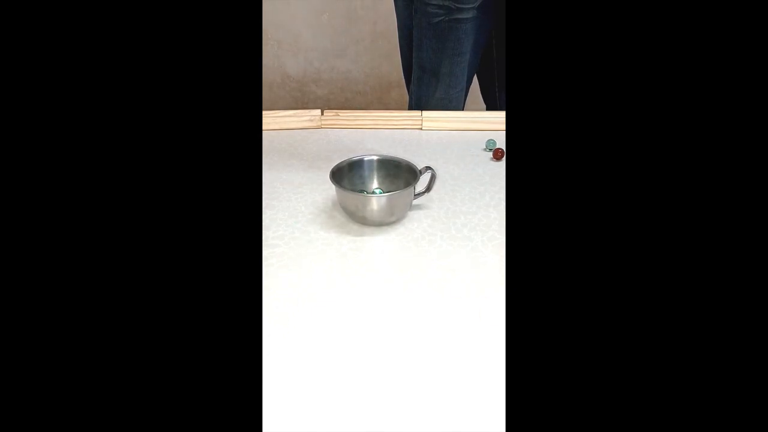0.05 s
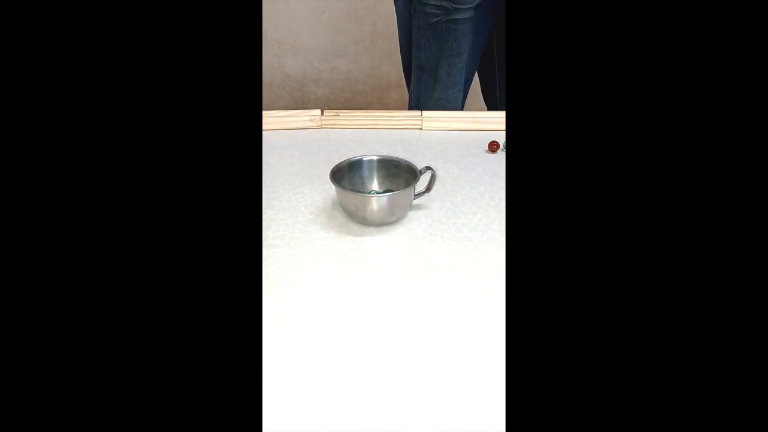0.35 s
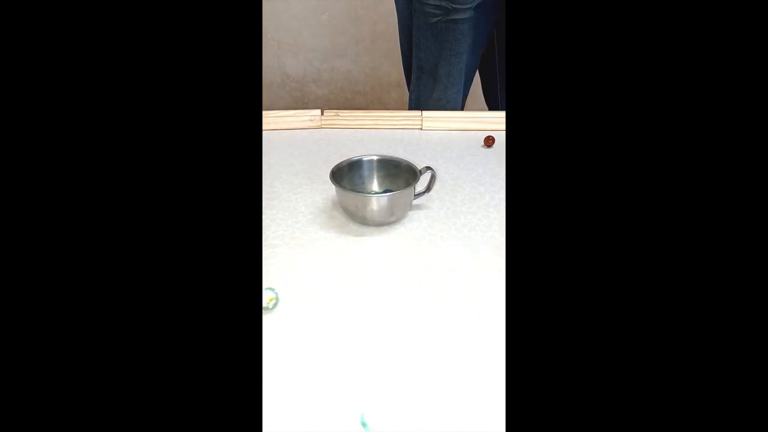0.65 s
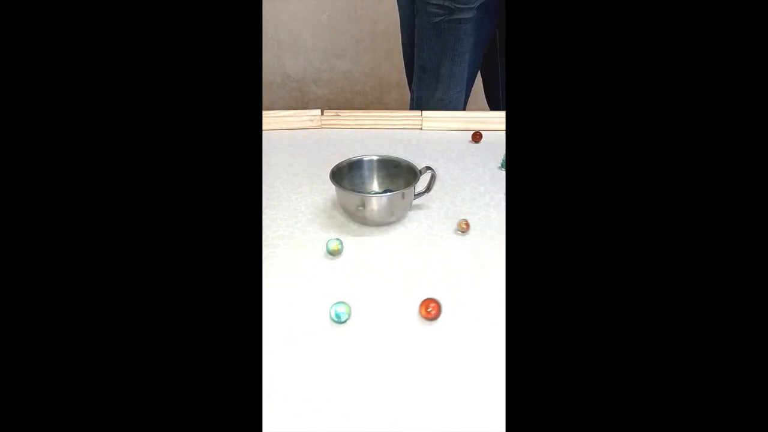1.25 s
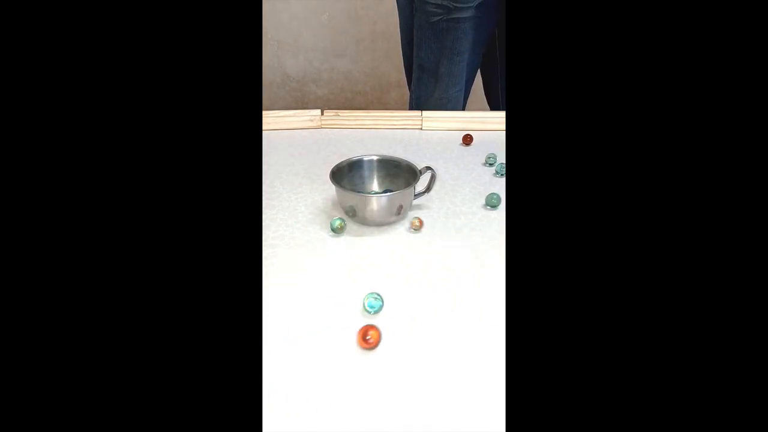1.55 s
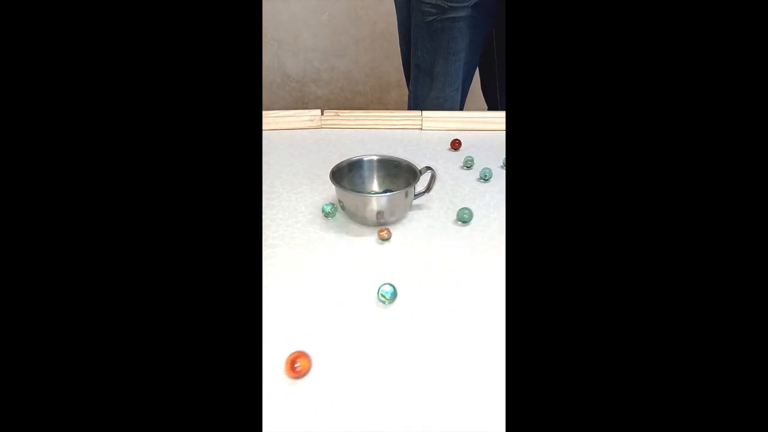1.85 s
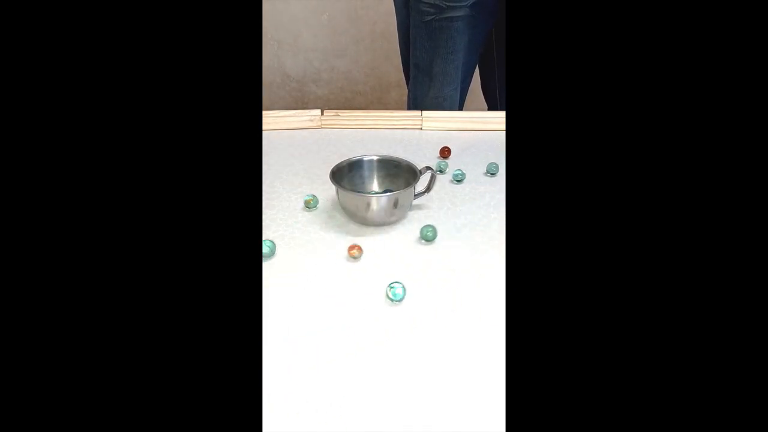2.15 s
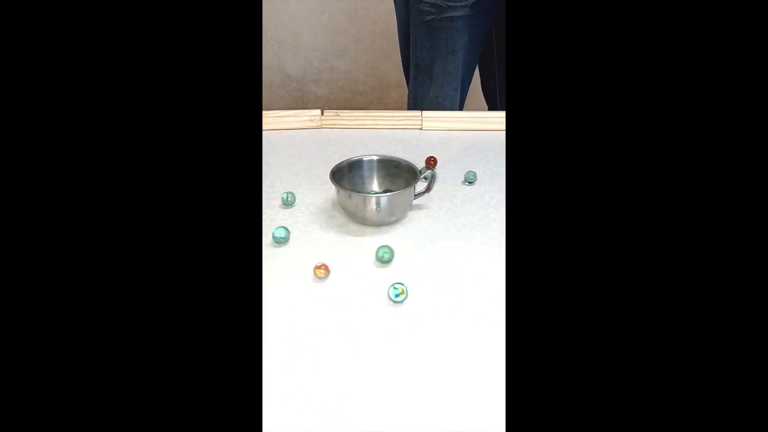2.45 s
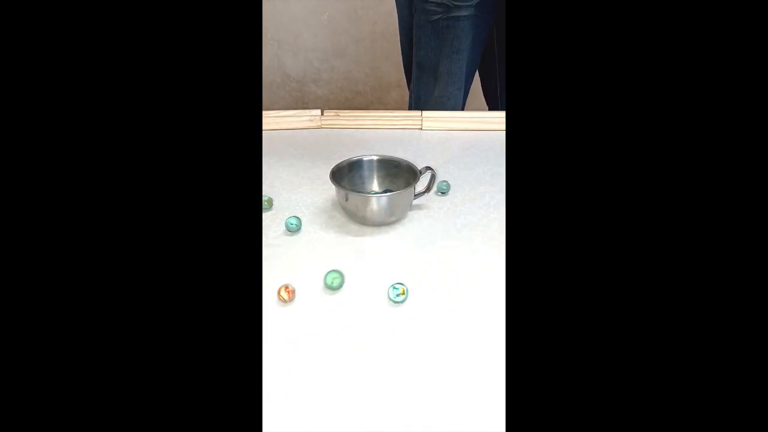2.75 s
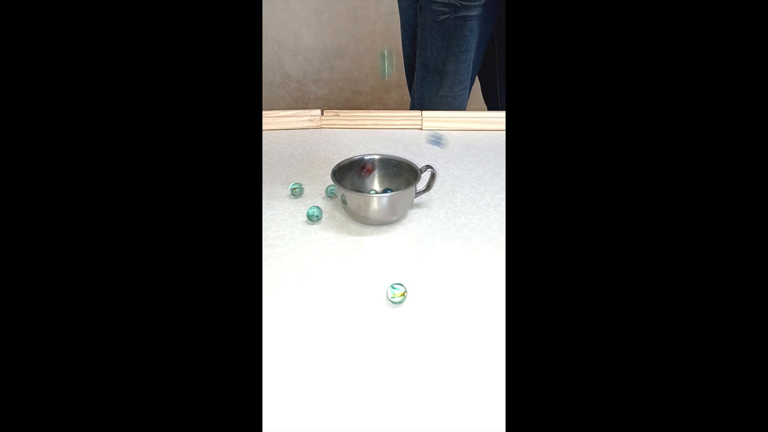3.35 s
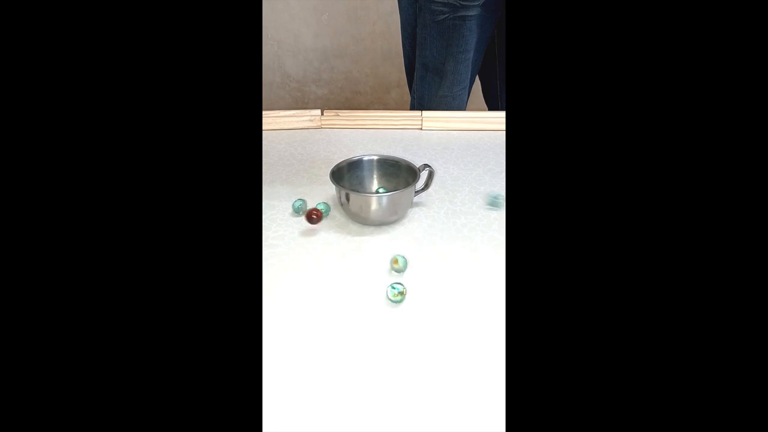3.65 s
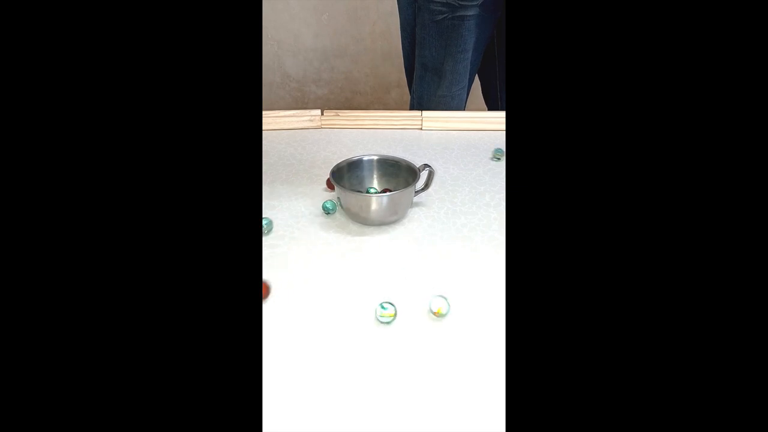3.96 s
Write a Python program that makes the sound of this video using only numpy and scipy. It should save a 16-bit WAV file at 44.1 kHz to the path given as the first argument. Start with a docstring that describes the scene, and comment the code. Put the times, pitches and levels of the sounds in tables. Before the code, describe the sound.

In a small bare room, glass marbles rumble and hiss over a hard table near the microphone. A loud clack follows, then a quick clatter of falling marbles that bounce, knock together and strike a ringing metal cup.

```python
"""On a hard tabletop in a small bare room, glass marbles roll close to the microphone.
A steel cup still rings from an earlier marble as the scene opens. Rolling marbles rumble, whirr and hop;
then more are dropped, clacking on the table, clicking together and setting the cup ringing again.
The room echoes every blow. The recorder's limiter, an automatic volume control, turns the hardest
blows down, so that their echo swells up behind them."""
import sys
import numpy as np
from scipy import signal
from scipy.fft import rfft, irfft, next_fast_len
from scipy.io import wavfile
from scipy.ndimage import uniform_filter1d, minimum_filter1d, map_coordinates

SR = 44100
rng = np.random.default_rng(int(sys.argv[2]) if len(sys.argv) > 2 else 0)


def pcm_store(signal):
    """Save signal as 16-bit PCM."""
    levels = np.round(np.clip(np.atleast_2d(signal), -1, 1) * 32767)
    wavfile.write(sys.argv[1], SR, levels.astype(np.int16).T)


N = 176400  # 4 seconds

# The tabletop's own tones. A fade time is how long a sound takes to fall by 60 dB.
# (pitch [Hz], level under rolling [dB], level under a landing [dB], fade time [s])
TABLE_TONES = [(78, -35, -2, 0.075), (128.3, -1.5, -3, 0.12), (214.1, -8, -14.5, 0.37),
               (259.5, -15, -5.5, 0.08), (321.7, 1, -15.5, 0.22), (415.6, -5, -23.5, 0.48),
               (463.3, 10.5, -21, 0.083), (509.2, 10.5, -14, 0.15), (648, 13.5, -8.5, 0.063)]


def amp(db):
    return 10 ** (np.asarray(db) / 20)


def unit_power(x):
    return x / np.sqrt(np.mean(x ** 2) + 1e-20)


def along(points, hz):
    """Read a curve of (frequency [Hz], value) points, giving each octave equal space."""
    freqs, values = np.transpose(points)
    return np.interp(np.log(hz + 1), np.log(freqs + 1), values)


def seconds(length):
    return np.arange(int(length * SR)) / SR


def wobble(rate):
    """A smooth curve through `rate` random points a second."""
    return map_coordinates(rng.standard_normal(2048), [np.arange(N) * rate / SR], mode="wrap")


def add(out, start_s, sound):
    """Mix a sound in; it may begin before the scene does."""
    i = round(start_s * SR)
    part = sound[:, max(-i, 0):N - i]
    out[:, max(i, 0):][:, :part.shape[1]] += part


def panned(x, left_db):
    return x * amp([[left_db / 2], [-left_db / 2]])


def coloured(x, gain):
    """Make some frequencies stronger and others weaker, following the curve gain(hz)."""
    n = x.shape[-1]
    size = 2 * next_fast_len(n // 2 + 2048)
    curve = unit_power(gain(np.fft.rfftfreq(size, 1 / SR)))
    cepstrum = irfft(np.log(np.maximum(curve, 1e-6)))
    # folding onto the first half keeps the filter from sounding ahead of a blow
    cepstrum[1:size // 2] *= 2
    cepstrum[size // 2 + 1:] = 0
    return irfft(rfft(x, size) * np.exp(rfft(cepstrum)), size)[..., :n]


def spread(pair):
    """Two unrelated signals become left and right: alike in the bass, unrelated in the treble."""
    # how alike the two sides are: (frequency [Hz], likeness [-1 to 1])
    likeness = [(60, 1), (200, 1), (400, 0.71), (900, 0.17), (1800, -0.19), (4000, 0.096), (12000, -0.15)]
    n = pair.shape[1]
    angle = np.arccos(np.clip(along(likeness, np.fft.rfftfreq(n, 1 / SR)), -1, 1)) / 2
    mid, side = irfft(rfft(pair) * [np.cos(angle), np.sin(angle)], n)
    return np.array([mid + side, mid - side])


def burst(envelope):
    """Stereo noise whose loudness follows the envelope."""
    noise = spread(rng.standard_normal((2, len(envelope)))) * envelope
    return noise * np.linalg.norm(envelope) / np.linalg.norm(noise, axis=1, keepdims=True)


def in_room(x, echo_db, build_s=0.0023):
    """The bare walls add a wash of echoes that lasts longest in the bass."""
    # the room's echo: (frequency [Hz], fade time [s])
    echo_fades = [(100, 0.76), (400, 0.47), (1500, 0.43), (4000, 0.49), (8000, 0.47), (15000, 0.2)]
    hz, t, noise = signal.stft(spread(rng.standard_normal((2, 24576))), SR, nperseg=256)
    fade = amp(-60 * t / along(echo_fades, hz)[:, None])
    echo = signal.istft(noise * fade * (1 - np.exp(-t / build_s)), SR, nperseg=256)[1]
    echo *= amp(echo_db) / np.linalg.norm(echo[0])
    echo[:, 0] += 1  # the direct sound
    return signal.fftconvolve(x, echo, axes=1)


def clack(tilt_db, crack_fade_s=0.0032, rattle_fade_s=0.022, rattle_db=-5):
    """Glass hits something hard: a sharp crack and a short rattle of the surface."""
    # the clack's tone colour: (frequency [Hz], level [dB])
    colour = [(60, -22), (200, -1), (600, -1.5), (1200, -0.5), (1900, 0.5), (3000, -4.5), (4500, -7.5),
              (6500, -15), (10000, -12.5), (13500, -9.5), (16000, -9)]
    t = seconds(0.1)
    noise = burst(amp(-60 * t / crack_fade_s) + amp(rattle_db - 60 * t / rattle_fade_s))
    return coloured(noise, lambda hz: amp(along(colour, hz) + tilt_db * np.log2(1 + hz / 1000)))


def cup(scatter_db=3.1, rise_s=0.01, side_phase_rad=0.78):
    """The steel cup rings with the tones the struck spot favours; marbles in it shorten the ring."""
    # the cup's own tones: (pitch [Hz])
    pitches = [894, 1442, 2284, 2315, 3435, 3687, 4446, 4864, 6235, 6295, 7677, 7956, 10606, 10950, 11114,
               11855, 12003, 12448, 14003, 15485]
    # for each tone: (fade time [s], level when hit on the floor [dB], wall [dB], rim [dB])
    tones = [(0.52, -9, -24, -1.5), (0.84, -15.5, -24, -12.5), (0.82, -8.5, -28, -6),
             (1.82, -1.5, -16, -19.5), (0.78, -9, -3.5, -13), (0.29, -20, -2, -2), (0.51, -41, -6, -1.5),
             (0.88, -15, -9.5, -6), (0.47, -15, -7, -7), (0.46, -30, -4, -7.5), (0.55, -26, -12, -8),
             (0.26, -36, -31, -27), (0.34, -34, -16, -4), (0.18, -34, -20, -17), (.35, -34, -5, -4),
             (0.22, -28, -20, -14), (0.33, -32, 0.5, -1), (.3, -30, -15, -18), (0.23, -34, -8, 7),
             (0.28, -34, -11, -3)]
    # the cup's floor, wall and rim, in that order: (spot [name])
    spots = ["floor", "wall", "rim"]
    # marbles hit the cup: (time [s], ring [dB], clack [dB], share of fade time [0 to 1], spot [name])
    hits = [(-.03, -15.5, -6.5, 0.98, "floor"), (3.3612, -5.5, 10, 1, "rim"),
            (3.472, -5, -0.5, 0.47, "floor"), (3.566, -7, 9, 0.88, "wall"), (3.6998, -26.5, -6, 1, "rim")]
    out, t = np.zeros((2, N)), seconds(1.3)
    for start_s, ring_db, clack_db, fade_share, spot in hits:
        ring = 0
        for hz, (fade_s, *levels) in zip(pitches, tones):
            strength = amp(levels[spots.index(spot)] + scatter_db * rng.normal(size=(2, 1)))
            fade = amp(-60 * t / (fade_s * fade_share))
            phase = 2 * np.pi * (hz * t + rng.random()) + side_phase_rad * rng.permutation([[-1], [1]])
            ring += strength * fade * np.sin(phase)
        add(out, start_s, in_room(amp(ring_db) * ring * (1 - np.exp(-t / rise_s)), echo_db=-17.5))
        add(out, start_s, in_room(amp(clack_db) * clack(tilt_db=1), echo_db=-2))
    return out


def room_air(level_db=-40.5):
    """A soft, steady hush behind everything."""
    # the hush's tone colour: (frequency [Hz], level [dB])
    colour = [(30, -34), (110, -5), (300, 0.5), (800, 9.5), (1500, 3.5), (2500, -9.5), (4000, -27),
              (9000, -29), (16000, -60)]
    noise = spread(rng.standard_normal((2, N)))
    return amp(level_db) * unit_power(coloured(noise, lambda hz: amp(along(colour, hz))))


def table_ring(levels_db, scatter_db=1):
    """A knock sets the tabletop's tones ringing, in a slightly different mix at each spot."""
    t, ring = seconds(0.5), 0
    for k, (db, (hz, _, _, fade_s)) in enumerate(zip(levels_db, TABLE_TONES)):
        fade = amp(db + scatter_db * rng.normal() - 60 * t / fade_s)
        ring += fade * np.sin(2 * np.pi * hz * t) * (-1) ** k
    return ring


def drops():
    """Each falling marble clacks and makes the tabletop thud."""
    # landings, bounces and knocks:
    # (time [s], clack [dB], brightness [dB per octave], thud [dB], left minus right [dB])
    landings = [(0.0139, -11, 1, -35, -1), (.058, -14, 0, -45, 1), (0.08, -27, 0, -39.5, 8),
                (.093, -20.5, -0.5, -42, -7), (.319, -27, -1.5, -63, 1.5), (.402, -44, -4, -70, -2),
                (2.899, 16, -0.5, 0, -1.5), (3.052, 1, -3.5, -17.5, -1), (3.097, -3, -6, -29, -1),
                (3.284, -13.5, -3, -33, 0), (3.384, 1, 0, -2, 6), (3.489, 4.5, 1.5, -6, 6),
                (3.5135, -2, 0.5, -33, -12), (3.5933, 3.5, -1.5, -13.5, 5), (3.636, 3.5, -1, -32, -8),
                (3.644, 1, -2.5, -32, 2), (3.683, 0.5, -3, -21, 5), (3.7004, 6.5, -0.5, -32, -2.5),
                (3.715, -15, 1, -26, 5), (3.758, -14, -1, -43, -5), (3.8031, -4, -4, -40, -1),
                (3.872, -10.5, -6.5, -49, 3)]
    out = np.zeros((2, N))
    for start_s, clack_db, tilt_db, thud_db, left_db in landings:
        add(out, start_s, in_room(panned(amp(clack_db) * clack(tilt_db), left_db), echo_db=-2))
        thud = table_ring([tone[2] for tone in TABLE_TONES])
        add(out, start_s, panned(amp(thud_db) * thud, left_db))
    return out


def contacts(per_second, colour):
    """Tiny random taps as the marbles meet the roughness of the tabletop."""
    taps = rng.standard_normal((2, N)) * (rng.random((2, N)) < per_second / SR)
    return unit_power(coloured(spread(taps), lambda hz: amp(along(colour, hz))))


def rolling(bumps_per_s=1000, grains_per_s=9000, ring_db=3, flutter_per_s=45):
    """Bumps drum on the table while finer grains whirr and hiss; all flutter as the marbles turn."""
    # how the low rumble, middle whirr and high hiss rise and fall: (time [s], relative level [dB])
    rumble_levels = [(0.2, -51), (0.22, -48), (0.64, -52), (0.66, -40.5), (0.87, -44), (1.03, -40),
                     (1.15, -21.5), (1.16, -29), (1.21, -31), (1.25, -19.5), (1.35, -29.5), (1.4, -19),
                     (1.7, -20.5), (1.71, -18.5), (2.02, -24), (2.04, -19.5), (2.21, -18.5), (2.23, -11.5),
                     (2.36, -16.5), (2.48, -25), (2.78, -38), (2.86, -27.5)]
    whirr_levels = [(0.55, -59), (0.75, -53), (0.77, -45), (1.0, -49.5), (1.13, -31.5), (1.38, -30.5),
                    (1.39, -26), (1.57, -21), (1.69, -26.5), (1.72, -23), (1.99, -33.5), (2.26, -22.5),
                    (2.52, -36), (2.86, -37.5)]
    hiss_levels = [(0.55, -76), (0.63, -77), (0.65, -53.5), (0.76, -54.5), (0.84, -58.5), (0.88, -79),
                   (0.96, -83), (0.97, -66), (1.0, -83), (1.06, -37), (1.14, -28), (1.23, -32.5),
                   (1.25, -24), (1.34, -34), (1.4, -23.5), (1.49, -25), (1.75, -23.5), (1.98, -31.5),
                   (2.24, -22.5), (2.34, -26), (2.35, -26.5), (2.57, -40.5), (2.59, -34.5), (2.66, -47.5),
                   (2.71, -40), (2.85, -53.5)]
    # marbles roll on after the drops: (time [s], rumble [dB], whirr [dB], hiss [dB])
    roll_on = [(3.2, -36, -34, -37.5), (3.55, -29, -26, -35), (3.8, -34.5, -38, -49.5),
               (4.0, -38, -38.5, -34.5)]
    # the tone colour of each layer: (frequency [Hz], level [dB])
    rumble_colour = [(30, -56), (60, -31), (120, -12), (165, -24.5), (220, -2), (330, 1), (520, -4),
                     (720, -6.5), (1100, -29), (2500, -72)]
    whirr_colour = [(350, -27), (700, 2), (900, 2.5), (1200, -6), (1700, -0.5), (2200, -13), (2800, -18.5),
                    (4500, -31)]
    hiss_colour = [(1000, -14.5), (1700, -1), (2700, 5), (3600, -1), (5500, 1), (6500, -0.5), (7600, 3.5),
                   (9000, 0.5), (11000, 3), (13200, 1), (15700, -7)]
    t, later = np.arange(N) / SR, np.array(roll_on)
    rumble_db, whirr_db, hiss_db = [
        np.interp(t, *np.vstack([levels, later[:, [0, column]]]).T)
        for column, levels in enumerate([rumble_levels, whirr_levels, hiss_levels], start=1)]
    bumps = contacts(bumps_per_s, rumble_colour)
    ring = table_ring([tone[1] for tone in TABLE_TONES])
    ringing = unit_power(signal.fftconvolve(bumps, ring[None], axes=1)[:, :N])
    flutter = wobble(flutter_per_s)
    rumble = unit_power(bumps + amp(ring_db) * ringing) * amp(rumble_db + 1.16 * flutter)
    whirr = contacts(grains_per_s, whirr_colour) * amp(whirr_db + 3.23 + 1.76 * wobble(flutter_per_s))
    hiss = contacts(grains_per_s, hiss_colour) * amp(hiss_db + 3.5 + 1.45 * flutter)
    return rumble + whirr + hiss


def clicks(fade_s=0.011, width_octaves=0.6, treble_db=-20):
    """Marbles knock against each other: very short and bright."""
    # glass meets glass: (time [s], level [dB], main pitch [Hz], left minus right [dB])
    collisions = [(.319, -24, 3220, -18), (0.61, -39, 1880, -5), (.736, -41, 11000, 0),
                  (0.799, -37, 2200, -4), (.968, -45, 7500, -6), (2.8688, -13.5, 6500, 6),
                  (3.1847, -15, 8100, 5), (3.223, -9.5, 8800, 3), (3.2798, -13.5, 10800, -6),
                  (3.306, -17, 5900, 1), (3.9087, -15, 10000, 0), (3.952, -25, 9000, 15),
                  (3.99, -27, 11000, -10)]
    out = np.zeros((2, N))
    for start_s, db, pitch_hz, left_db in collisions:
        def colour(hz):
            peak = np.exp(-0.5 * (np.log2((hz + 1) / pitch_hz) / width_octaves) ** 2)
            return peak + amp(treble_db) * hz / (hz + pitch_hz)
        click = coloured(burst(amp(-60 * seconds(0.051) / fade_s)), colour)
        add(out, start_s, in_room(panned(amp(db) * click, left_db), echo_db=-9))
    return out


def hops(pitch_hz=393, fade_s=0.036, rise_s=0.0016):
    """Rolling marbles hop over flaws, and the tabletop shakes briefly with a dull knock."""
    # each hop: (time [s], level [dB])
    knocks = [(1.1264, -7.5), (1.147, -11.5), (1.227, -10.5), (2.227, 0), (2.275, 2), (2.304, -2.5)]
    out, t = np.zeros((2, N)), seconds(0.1)
    knock = np.sin(2 * np.pi * pitch_hz * t) * amp(-60 * t / fade_s) * (1 - np.exp(-t / rise_s))
    for start_s, db in knocks:
        add(out, start_s, in_room(amp(db) * np.array([knock, knock]), echo_db=-0.5))
    return out


def scene():
    """The room's hush, the rolling and all the blows, added together."""
    return room_air() + rolling() + hops() + drops() + cup() + clicks()


def limiter(x, threshold_db=-6.5, sense_s=0.005, look_ahead_s=0.0052, release_s=0.02):
    """Turn the volume down just before a loud blow and let it come back; peaks still too high clip."""
    power = np.abs(uniform_filter1d(np.mean(x ** 2, axis=0), int(sense_s * SR)))
    excess_db = np.maximum(10 * np.log10(power + 1e-12) - threshold_db, 1e-9)
    age = np.arange(N) / SR / release_s
    cut_db = np.exp(np.maximum.accumulate(np.log(excess_db) + age) - age)  # each cut dies away
    window = 2 * int(look_ahead_s * SR) + 1
    gain_db = uniform_filter1d(minimum_filter1d(-cut_db, window), window)
    return np.clip(x * amp(gain_db), -1, 1)


def record(dry, low_cut_hz=48, top_hz=15850, edge_hz=400):
    """Two unequal microphone openings feed the limiter; the deepest bass and top treble are cut."""
    # how the two openings differ: (frequency [Hz], left minus right [dB])
    balance = [(40, -13), (70, -10), (130, 6.5), (260, .5), (900, 1), (2000, -0.5), (5000, 0), (12000, 0.5)]
    size = next_fast_len(N + 8192)
    hz = np.fft.rfftfreq(size, 1 / SR)
    side_gains = amp(np.outer([0.5, -0.5], along(balance, hz)))
    x = irfft(rfft(dry, size) * side_gains, size)[:, :N]
    x = signal.sosfilt(signal.butter(2, low_cut_hz, "high", fs=SR, output="sos"), x)
    treble_cut = np.clip((top_hz - hz) / edge_hz + 0.5, 0, 1)
    return irfft(rfft(limiter(x), size) * treble_cut, size)[:, :N]


dry = scene()
out = record(dry)
pcm_store(out)
```